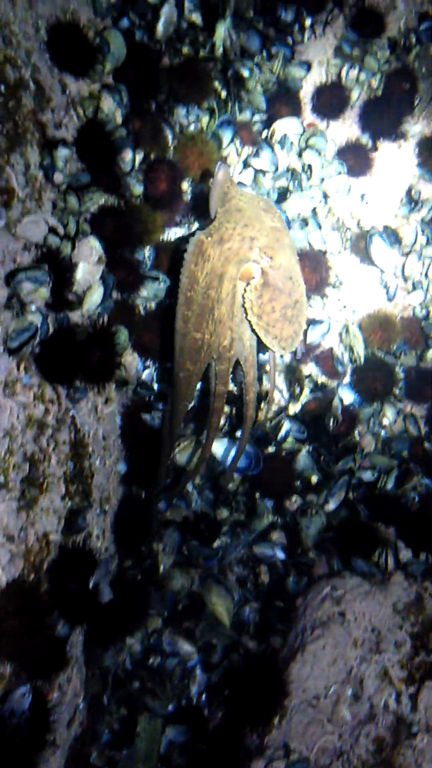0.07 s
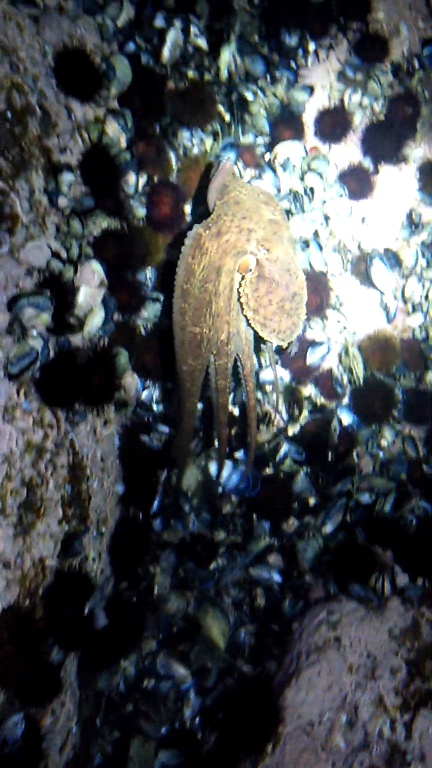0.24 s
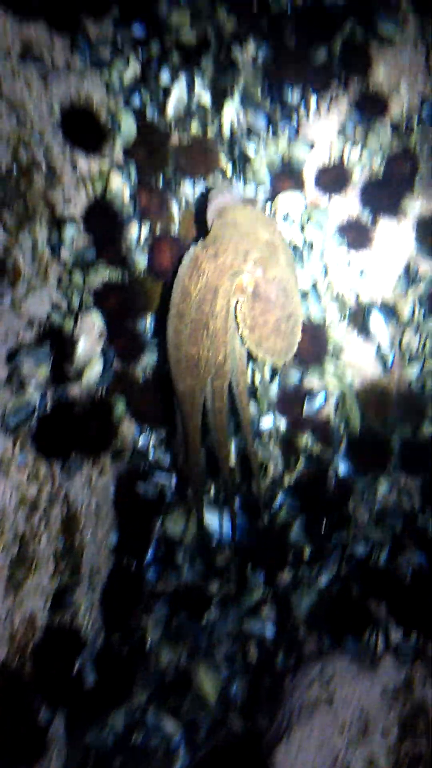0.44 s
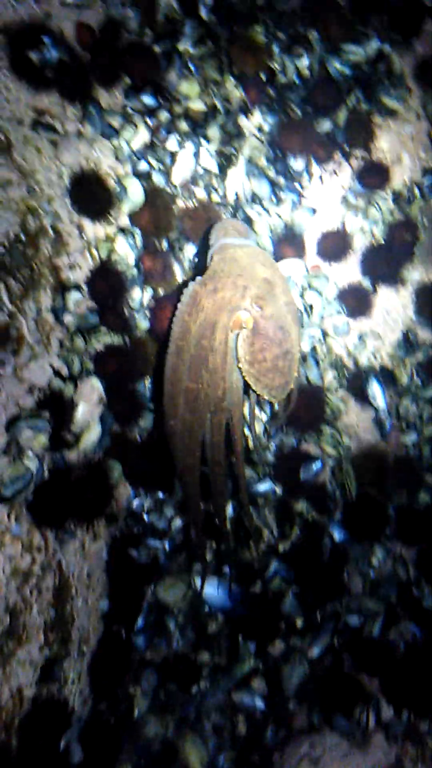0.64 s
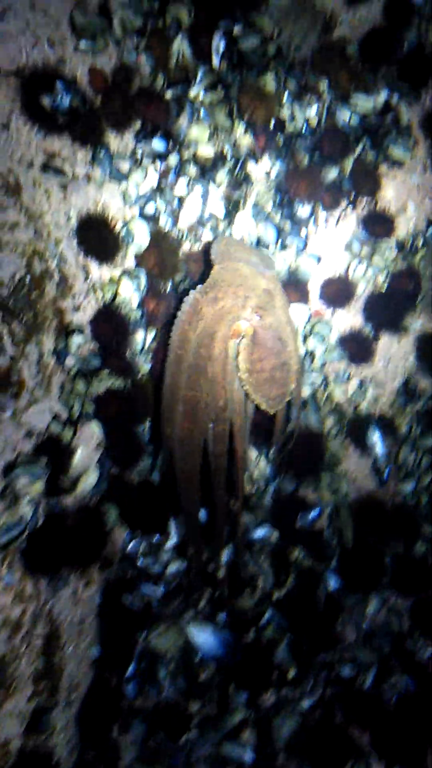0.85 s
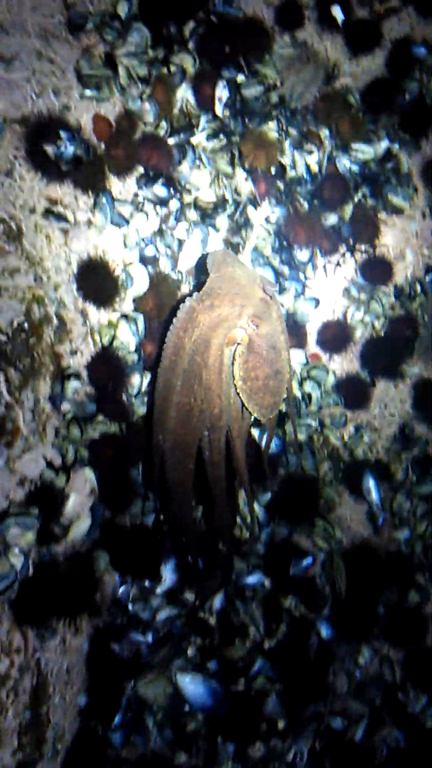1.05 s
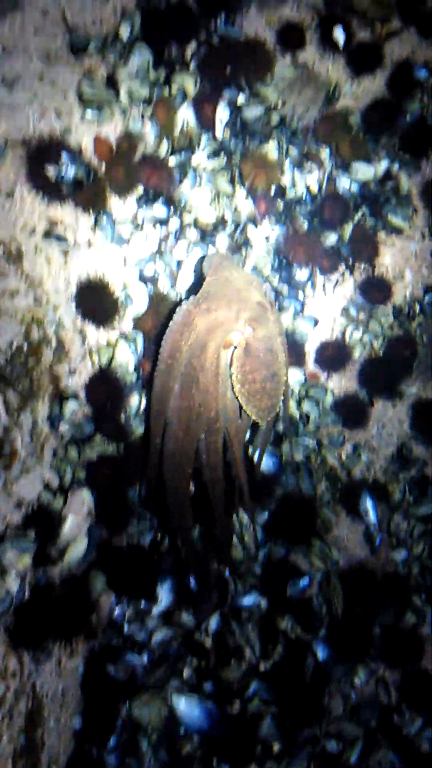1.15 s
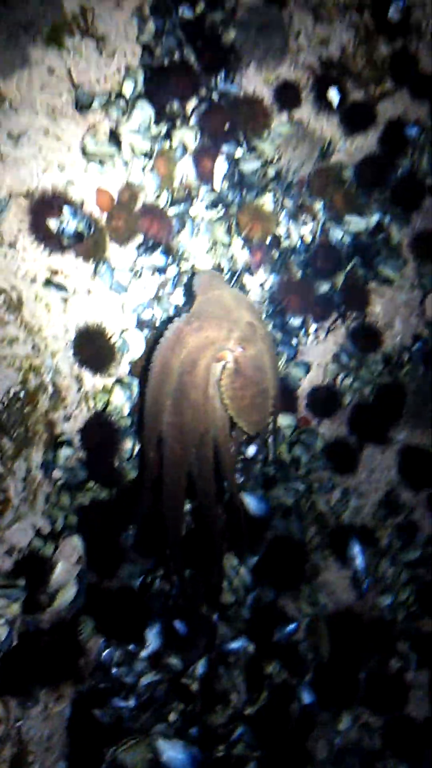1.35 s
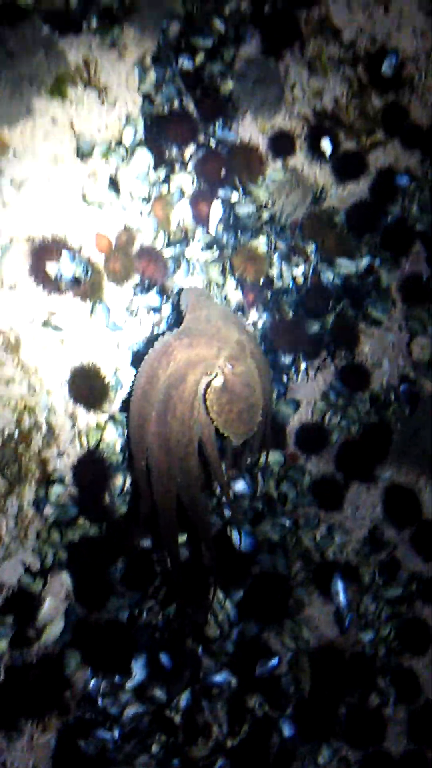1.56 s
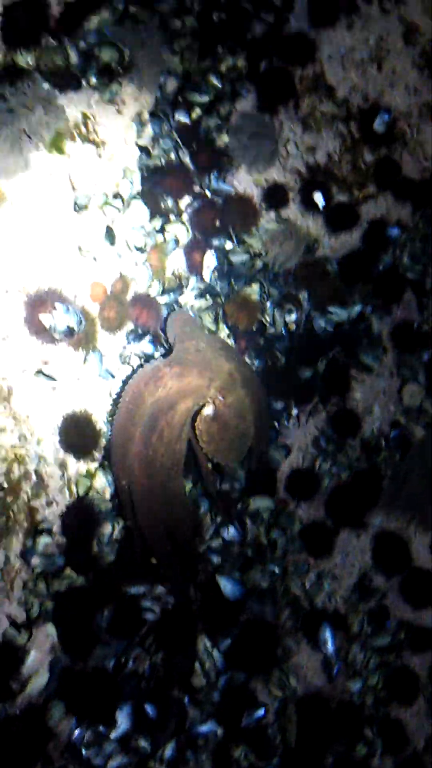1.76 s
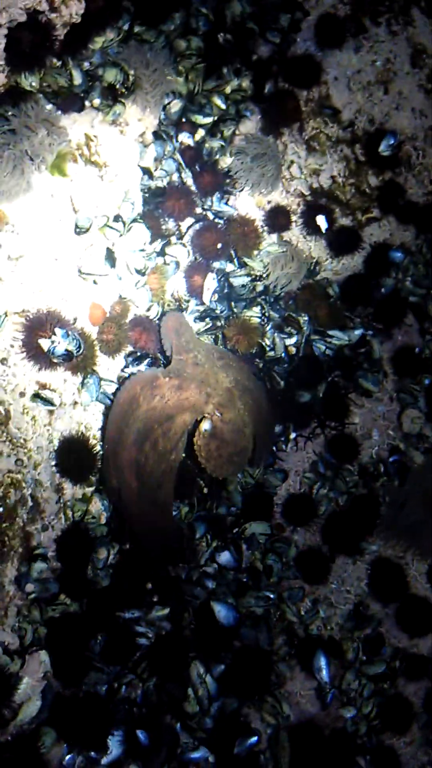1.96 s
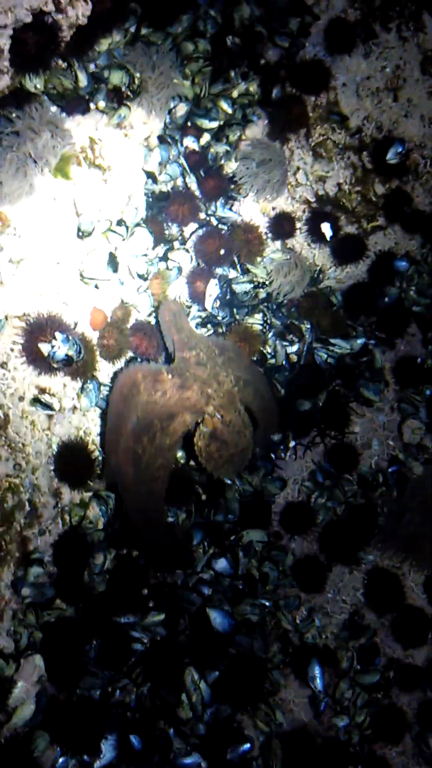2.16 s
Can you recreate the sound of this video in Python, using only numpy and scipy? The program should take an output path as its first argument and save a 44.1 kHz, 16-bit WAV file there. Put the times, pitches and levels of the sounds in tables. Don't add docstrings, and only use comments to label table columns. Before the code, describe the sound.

Brittle crunching of shells close to an underwater microphone, bursting into a brief scrape, then thinning

```python
import sys
import numpy as np
from scipy import signal
from scipy.fft import rfft, irfft
from scipy.io import wavfile
from scipy.ndimage import uniform_filter1d

SR = 44100
rng = np.random.default_rng(int(sys.argv[2]) if len(sys.argv) > 2 else 0)


def dump_mix(stems):
    frames = np.atleast_2d(stems).T
    limited = np.clip(frames, -1, 1)
    pcm = np.round(limited * 32767).astype(np.int16)
    wavfile.write(sys.argv[1], SR, pcm)


def gain_from_db(level_db):
    decades = np.asarray(level_db, float) / 20
    return 10 ** decades


N = 97020


def level(x, db):
    return x * gain_from_db(db) / np.sqrt(np.mean(x ** 2))


def curve_gain(curve, offset_db=0):
    time_s, level_db = np.array(curve).T
    return gain_from_db(np.interp(np.arange(N) / SR, time_s, level_db) + offset_db)


def fall(x, tau_s):
    return signal.lfilter([1], [1, -np.exp(-1 / (tau_s * SR))], x)


def spikes(per_s, scatter_db):
    chance = rng.random(N)
    size = np.minimum(rng.exponential(size=N), 4)
    return (chance < per_s / SR) * gain_from_db(scatter_db * size)


def ring(x, table):
    probe = np.r_[x, np.zeros(2048), 1, np.zeros(2047)]
    out = 0
    for k, (pitch_hz, width_hz, level_db) in enumerate(table):
        b, a = signal.iirpeak(pitch_hz, pitch_hz / width_hz, SR)
        steep = signal.lfilter(b, a, signal.lfilter(b, a, probe))
        out = out + (-1) ** k * gain_from_db(level_db) * steep
    return out[:N] / np.sqrt(np.sum(out[-2048:] ** 2))


# pitch_hz, width_hz, level_db
TOP_RING = [(8470, 1620, 11), (9650, 2130, 3), (14000, 2400, -30), (10800, 12900, -8), (15400, 1900, -14)]
MID_RING = [(5328, 1430, 4), (6040, 2650, -3), (4480, 3500, -8)]
LOW_RING = [(2565, 980, 6), (1877, 640, 1), (1074, 970, -3.5)]


def housing(top, mid, low):
    out = 0
    for env, table in ((top, TOP_RING), (mid, MID_RING), (low, LOW_RING)):
        out = out + ring(env * rng.standard_normal(N), table)
    return out


# pitch_hz, level_db (per Hz)
SEA_SPECTRUM = [(25, -36), (45, -6), (110, -2), (260, -11), (520, -21), (900, -32), (2400, -33.5),
                (3500, -44.5)]
# time_s, level_db
SWELL = [(0, -2), (.6, 0.2), (.8, -4), (1.05, 3.5), (1.3, 0.5), (1.5, 1), (2.2, 2)]


def sea():
    sea_db, fade_db_oct, lump_db = -34.5, -3, .8
    hiss_db, hiss_mid_db, hiss_scatter_db = -58.5, -6.5, .74
    hz = np.maximum(np.arange(N // 2 + 1) * SR / N, 1)
    shape = np.array(SEA_SPECTRUM)
    db = np.interp(np.log(hz), np.log(shape[:, 0]), shape[:, 1])
    db = db + fade_db_oct * np.log2(np.maximum(hz / shape[-1, 0], 1))
    noise = irfft(rfft(rng.standard_normal(N)) * gain_from_db(db), N)
    low = signal.sosfilt(signal.butter(1, 300, fs=SR, output="sos"), noise)
    lumps = uniform_filter1d(uniform_filter1d(rng.standard_normal(N), SR // 10), SR // 10)
    swell = curve_gain(SWELL) * gain_from_db(level(lumps, 0) * lump_db)
    rumble = level(noise + low * (swell - 1), sea_db)
    flicker = level(uniform_filter1d(rng.standard_normal(N), SR // 40), 0)
    hiss = gain_from_db(hiss_db + flicker * hiss_scatter_db)
    return rumble + housing(hiss, hiss * gain_from_db(hiss_mid_db), 0 * hiss)


BUBBLE_S = [.0008, .9577, 1.095, 1.447, .852, .331, .2062, .701]
# pitch_hz, level_db (peak), ring_s
BUBBLES = [
    (2250, -27.5, 0.0023),
    (1650, -28.5, 0.0024),
    (1640, -25, 0.0024),
    (690, -28.5, 0.001),
    (876, -17.5, 0.00076),
    (2900, -23.5, 0.0017),
    (2000, -21.5, 0.0041),
    (870, -36, 0.0072),
]


def bubbles():
    glide = .02
    out = 0
    for start_s, (pitch_hz, level_db, ring_s) in zip(BUBBLE_S, BUBBLES):
        t = np.clip(np.arange(N) / SR - start_s, 0, None)
        turns = pitch_hz * t * (1 + glide * t / ring_s / 2)
        out = out + gain_from_db(level_db) * np.exp(-t / ring_s) * np.sin(2 * np.pi * turns)
    return out


def grit(curve, per_s, scatter_db, db, mid_db, low_db):
    grain_fall_s = .0006
    line = curve_gain(curve, db)
    top, own, other = (line * level(fall(spikes(per_s, scatter_db), grain_fall_s), 0) for _ in range(3))
    mid = (top + own) / 2 * gain_from_db(mid_db)
    low = (own + other) / 2 * gain_from_db(low_db)
    return housing(top, mid, low), top


# time_s, level_db
STIR = [(0, -73), (.45, -49), (.65, -37), (.9, -41), (1.0, -35.5), (1.05, -57), (1.15, -45), (1.2, -40),
        (1.44, -39.5), (1.55, -53), (2.2, -81)]


def stir():
    sound, _ = grit(STIR, per_s=400, scatter_db=4.0, db=-1, mid_db=-9, low_db=-12.5)
    return sound


# time_s, level_db
GRIND = [
    (.685, -58),
    (.70, -34),
    (.7405, -38.5),
    (.742, -21),
    (.79, -22),
    (.81, -30),
    (.845, -33),
    (.862, -62),
    (.875, -73),
]
# pitch_hz, width_hz, level_db
GRIND_TOP = (8350, 600, -3)


def grind():
    body = (934, 1060, -12)  # pitch_hz, width_hz, level_db
    sound, env = grit(GRIND, per_s=1800, scatter_db=2.6, db=0, mid_db=-7, low_db=-10)
    for resonance in (body, GRIND_TOP):
        sound = sound + gain_from_db(resonance[2]) * ring(env * rng.standard_normal(N), [resonance])
    return sound


# start_s, level_db (peak), mid_db (re top ring), low_db (re
CRACKS = [(0.0003, -26, -15, -10), (0.0041, -25.5, -8, -11), (0.0136, -30.5, -3, -0.5),
          (0.1217, -18.5, 1.5, -23), (0.1241, -11.5, -3.5, -28), (0.1305, -25, -22, -32),
          (0.202, -17, -16, -26), (0.2055, -5.5, -8.5, -14), (0.2074, -15, -17, -15),
          (0.21, -23, -16, -21), (0.2804, -17.5, -15, -40), (0.3234, -8.5, -17, -30),
          (0.3308, -13.5, -3.5, -17), (0.3459, -20.5, -20, -16.5), (0.4801, -19.5, -23, -20),
          (0.5098, -29, -1, -9), (0.5122, -11, 0, -24), (0.5698, -20.5, -16, -11.5),
          (0.6094, -16, -20, -24), (0.6226, -23, -7, -25), (0.6386, -6, -16, -34),
          (0.643, -26, -20, -30), (0.6558, -27, -25, -28), (0.665, -9.5, -18, -43),
          (0.6729, -22, -10, -15), (0.7014, -22, -2, -19), (0.7067, -27, -7, -13),
          (0.7174, -21, -12, -26), (0.7248, -24, -11, -23), (0.726, -19, -21, -32),
          (0.7416, -1.5, -2, -17.5), (0.7459, -12, -6, -17), (0.7476, -11, -11, -9.5),
          (0.7515, -5, -1, -17.5), (0.7555, -8, -5.5, -7), (0.7594, -18, -9, -21),
          (0.7618, -2, -15, -16), (0.7651, -6.5, -2.5, -14.5), (0.7703, -2, -13, -31),
          (0.7724, -13, -13, -24), (0.7759, -10, -3, -12), (0.7793, -10, -4, -18),
          (0.7811, -6.5, -6.5, -16), (0.7834, -4, -19, -24), (0.786, -18, -14, -23),
          (0.7882, -17, -17, -35), (0.7907, -23, -10, -12), (0.7942, -13, -11, -21),
          (0.7975, 1.5, -19, -27), (0.7999, -11, -16, -31),
          (0.8028, -14, -9, -9), (0.8044, -20, -11, -26), (0.8056, -19, -4, -23),
               (0.8085, -19, -7, -16), (0.8116, -20, -7, -5), (0.8152, -4.5, -15, -40),
               (0.8186, -18, 10.5, -11), (0.827, -22, -6, -10), (0.8305, -7, -5, -18),
               (0.8337, -1, -6, -16), (0.8394, -16, -16, -12), (0.8413, -27, -16, -13),
               (0.852, -4, -6.5, -16), (0.8557, -21, -5, -6), (0.8876, -11.5, -17, -23),
               (0.8935, -16, -33, -36), (0.9154, -16.5, -30, -25), (0.9514, -23, -16, -39),
               (0.954, -17, -20, -21), (0.9755, -27, -19, -10), (1.0078, -19.5, -14, -31),
               (1.1683, -15, 0, -11), (1.1706, -10.5, -16, -12.5), (1.19, -22, -2.5, -24),
               (1.193, -24, -12, -31), (1.1979, -16, -10, -27), (1.2413, -16, -12, -27),
               (1.2679, -19, -10, -16), (1.276, 0, -17, -29), (1.2764, -11.5, -12, -27),
               (1.2781, -18, -5.5, -19), (1.2865, -12.5, -22, -34), (1.289, -22, -26, -36),
               (1.2997, -21, -27, -32), (1.3113, -4.5, -18, -34), (1.3159, -15.5, -22, -20),
               (1.334, -20, -16, -33), (1.3484, -21.5, -5, -13.5), (1.3661, -2, -18, -31),
               (1.3685, -22, -14, -14), (1.3846, -1, -14.5, -27), (1.4275, -14.5, -18, -22),
               (1.4373, -2, -18, -37.5), (1.4387, -6.5, -13, -32), (1.4471, -15, -1, -24),
               (1.534, -18.5, -14.5, -21.5), (1.535, -22.5, -5, -29), (1.8089, -19, -7, -26),
               (2.0924, -15.5, -33, -43), (2.1904, -23, -3, -10)]
# start_s, level_db (peak)
TICKS = [(0.0194, -24), (0.0411, -38), (0.0638, -32), (0.0728, -23), (0.079, -30), (0.094, -31),
         (0.1128, -27), (0.1571, -30.5), (0.1709, -29.5), (0.2138, -34), (0.24, -27.5), (0.2653, -29),
         (0.2965, -34), (0.3259, -37), (0.3334, -24), (0.3353, -31), (0.3399, -36), (0.3707, -42),
         (0.3846, -30), (0.3938, -37), (0.4073, -28), (0.4099, -24), (0.4389, -38), (0.4567, -26),
         (0.4742, -20.5), (0.5152, -21.5), (0.5343, -23), (0.5533, -19.5), (0.5564, -23),
         (0.562, -34), (0.5804, -29), (0.5826, -25), (0.5979, -30), (0.6182, -29), (0.6322, -35),
         (0.6629, -24), (0.6692, -30), (0.6746, -31), (0.6798, -32), (0.6835, -29), (0.6902, -20),
         (0.7091, -30), (0.7112, -29), (0.7307, -24), (0.7335, -21), (0.8574, -34), (0.8659, -27),
         (0.8682, -29), (0.8784, -28), (0.8903, -33),
         (0.897, -24), (0.9063, -28), (0.9232, -28), (0.941, -25), (0.9638, -27), (0.9793, -28),
              (1.0034, -27), (1.019, -22.5), (1.0418, -31.5), (1.0727, -22.5), (1.0869, -30), (1.0926, -22),
              (1.137, -30), (1.1586, -23), (1.208, -39), (1.2187, -26.5), (1.2244, -32), (1.2478, -28),
              (1.256, -37), (1.2615, -36), (1.2709, -20), (1.2823, -32), (1.3063, -24), (1.3216, -23),
              (1.3517, -28), (1.3629, -20), (1.3775, -34), (1.3894, -31), (1.3992, -28), (1.4147, -30),
              (1.4243, -27), (1.4302, -32), (1.443, -34), (1.4507, -29), (1.4523, -23), (1.4803, -25.5),
              (1.4892, -23.5), (1.5215, -25), (1.5315, -25.5), (1.6533, -36.5), (1.7455, -31),
              (1.7504, -37), (1.7547, -22.5), (1.7994, -36), (1.8202, -37), (1.849, -32.5), (1.8872, -35),
              (1.9336, -33.5), (2.0512, -21), (2.165, -23.5)]
# start_s, end_s
PRESSED_S = (.755, .85)
# pitch_hz, width_hz, level_db
PRESSED_RING = [(8350, 950, -1.5), (9540, 2200, -11), (10350, 6400, -18)]


def cracks():
    tick_mid_db, tick_low_db, tick_scatter_db = -9.5, -24, 4
    rise_s, fall_s, tail_s, low_slower = .0003, .0008, .005, 1.42
    crack_db, tail_db, snap_db, snap_lag_s = 2.5, -21.5, 2.5, .0003
    ticks = np.array(TICKS)
    colour = [tick_mid_db, tick_low_db] + tick_scatter_db * rng.standard_normal((len(ticks), 2))
    rows = np.vstack([CRACKS, np.c_[ticks, colour]])
    start_s, level_db, mid_db, low_db = rows.T
    at = np.clip((start_s * SR).astype(int), 0, N - 1)
    pressed = (start_s > PRESSED_S[0]) & (start_s < PRESSED_S[1])
    splinters = fall(spikes(per_s=1500, scatter_db=3.5), .00025)
    splinters = level(splinters + 2.0, 0)
    rings = ((TOP_RING, ~pressed, 0, 1), (PRESSED_RING, pressed, 0, 1),
             (MID_RING, 1, mid_db, 1), (LOW_RING, 1, low_db, low_slower))
    out = 0
    for table, struck, rel_db, slow in rings:
        hit = np.zeros(N)
        np.add.at(hit, at, struck * gain_from_db(level_db + rel_db + crack_db))
        burst = fall(hit, slow * fall_s) - fall(hit, rise_s)
        env = (burst + gain_from_db(tail_db) * fall(hit, tail_s)) * splinters
        snap = np.roll(hit, int(snap_lag_s * SR)) * gain_from_db(snap_db) * slow
        out = out + ring(env * rng.standard_normal(N) + snap, table)
    return out


def scene():
    return (sea() + bubbles() + stir() + grind() + cracks())[None]


def top_cut(x):
    return signal.sosfilt(signal.butter(12, 16980, fs=SR, output="sos"), x)


def record(dry):
    headroom, top_hz = 1.12, 15750
    rounded = np.tanh(headroom * dry) / headroom
    mix = signal.sosfilt(signal.ellip(8, .2, 60, top_hz, fs=SR, output="sos"), rounded)
    return top_cut(mix)


dry = scene()
out = record(dry)
dump_mix(out)
```